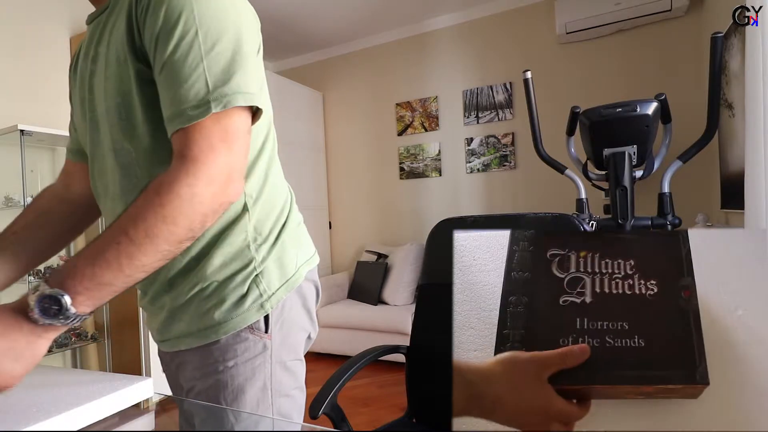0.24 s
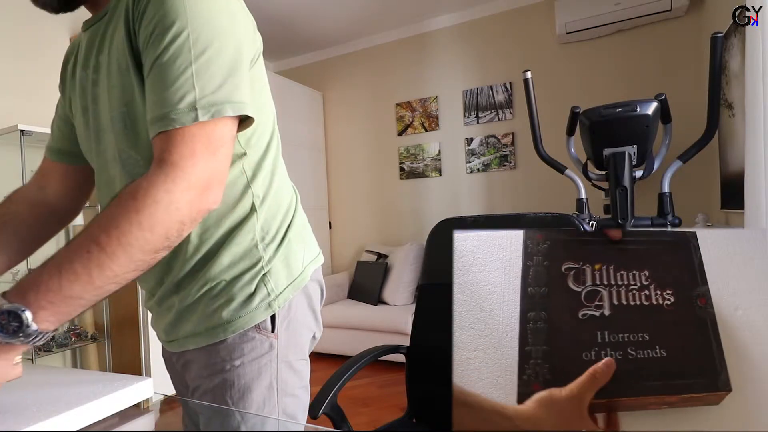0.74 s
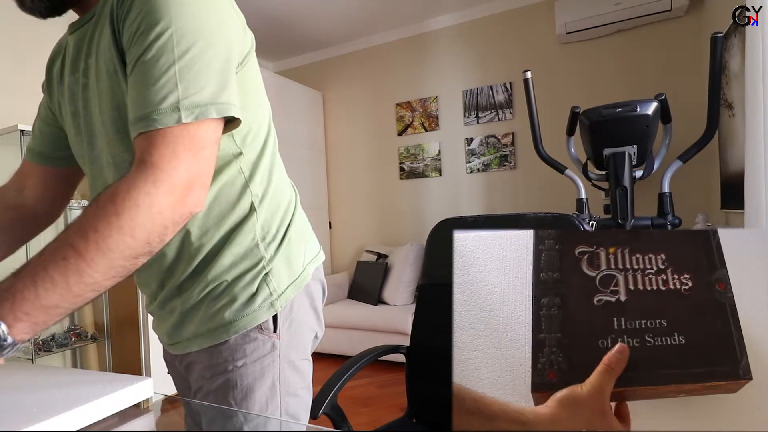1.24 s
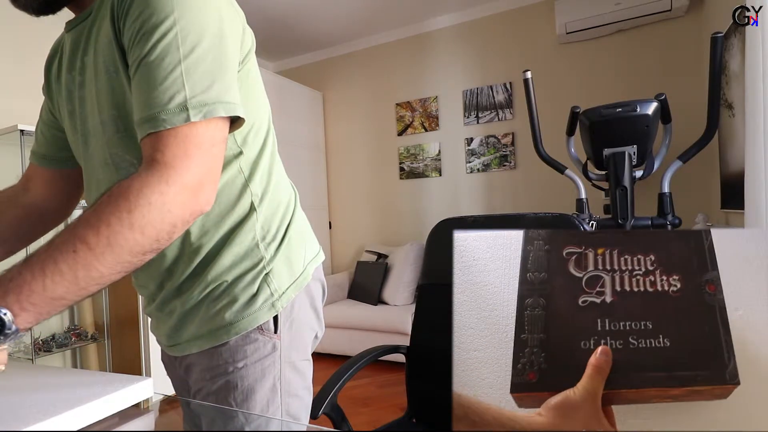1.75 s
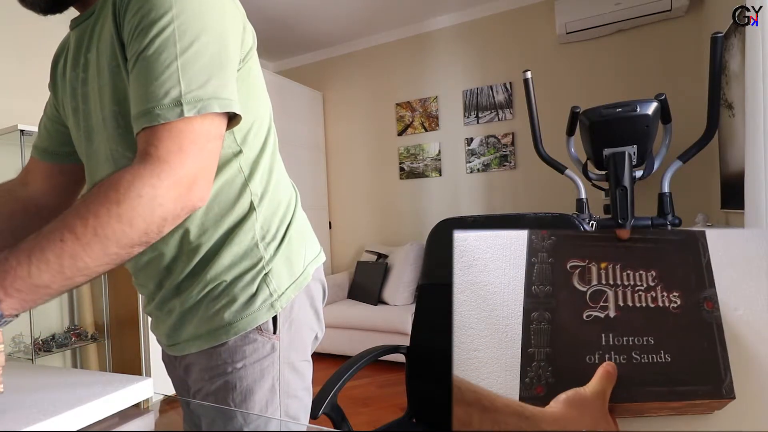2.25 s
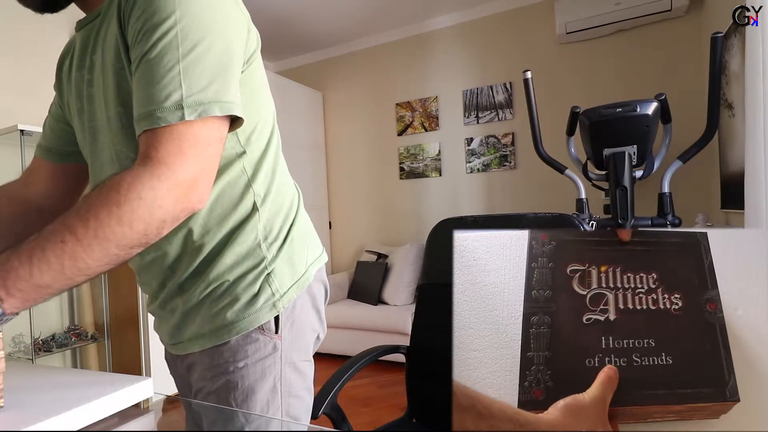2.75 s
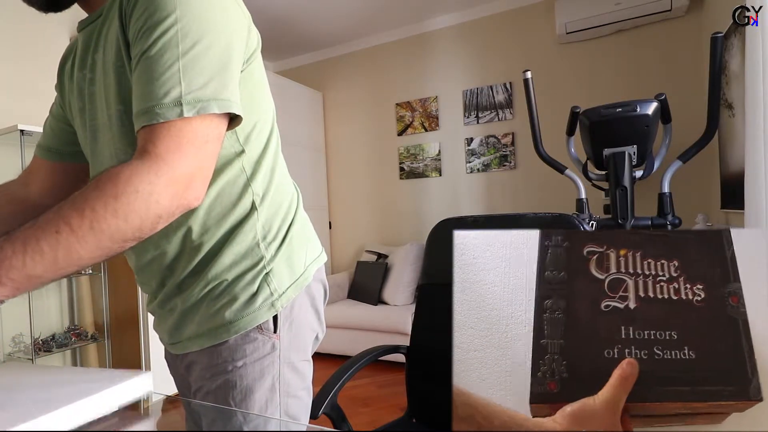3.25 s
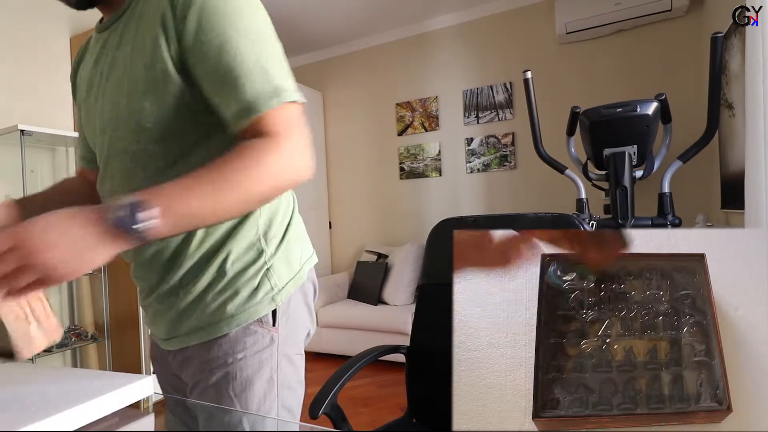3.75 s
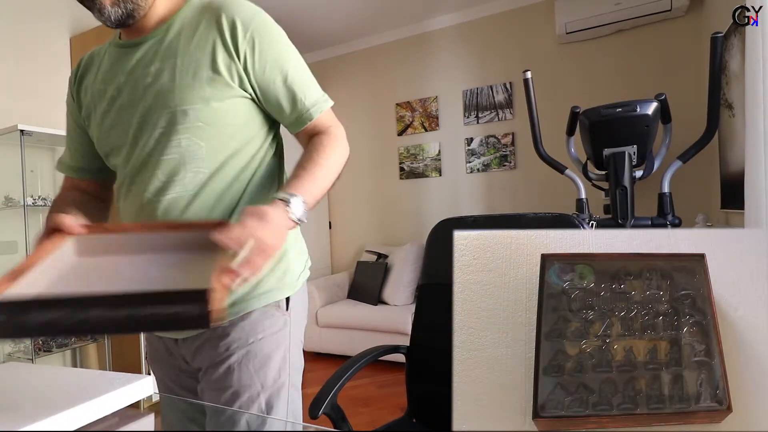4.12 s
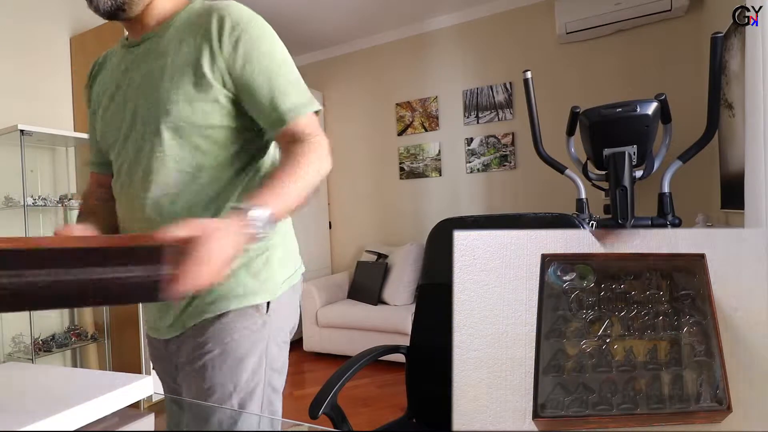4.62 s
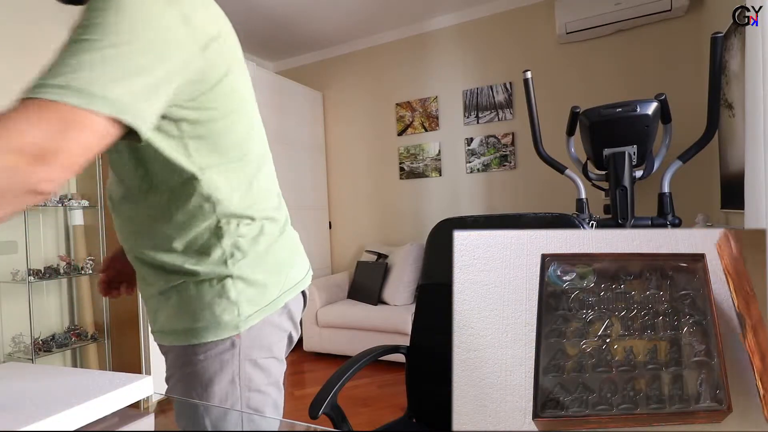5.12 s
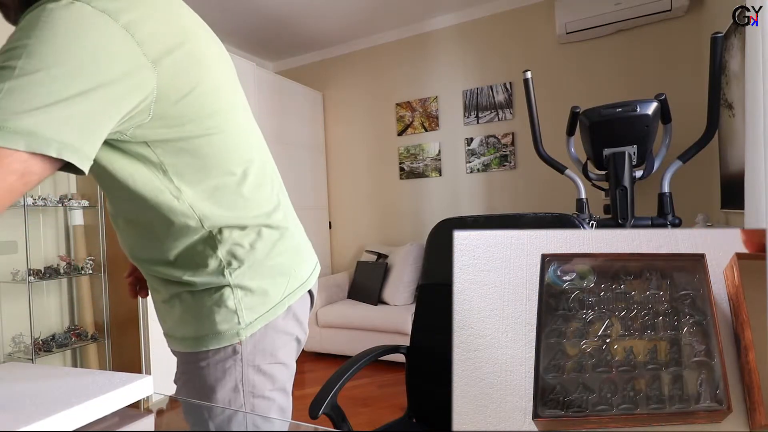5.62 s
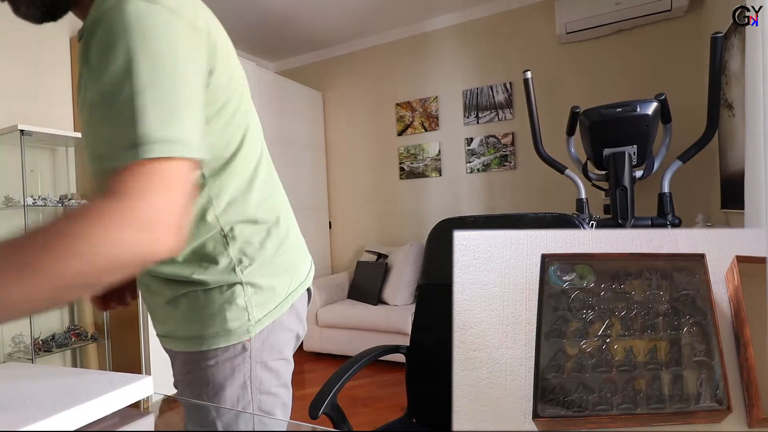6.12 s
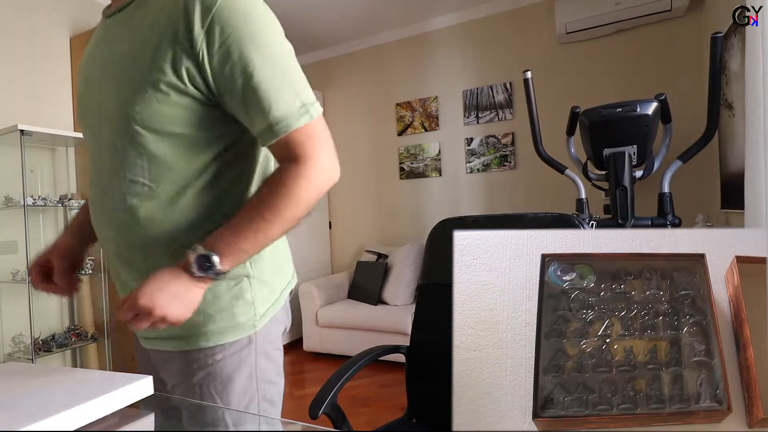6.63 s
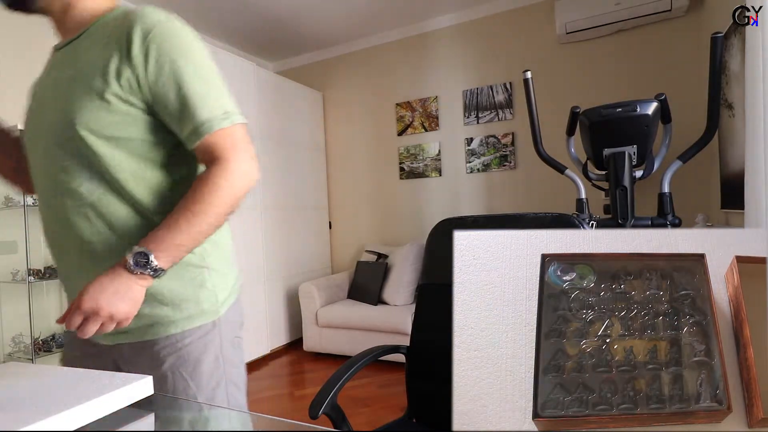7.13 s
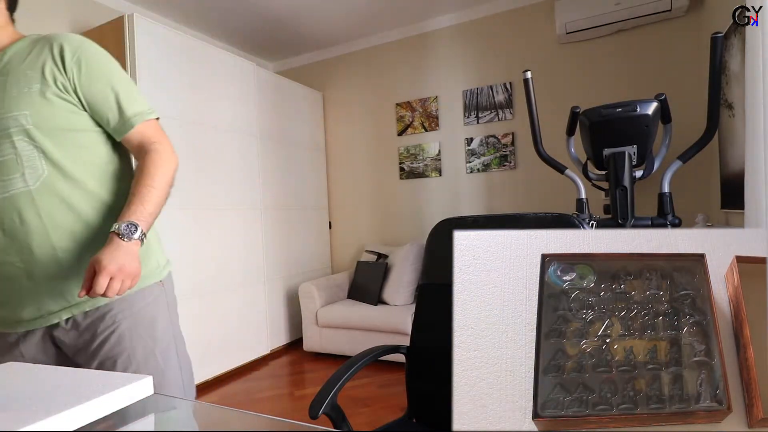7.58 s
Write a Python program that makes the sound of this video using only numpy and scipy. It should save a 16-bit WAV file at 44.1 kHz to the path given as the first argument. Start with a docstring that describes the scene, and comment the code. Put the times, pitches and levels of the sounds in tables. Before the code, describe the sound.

A tight cardboard box lid creaks and creeps loose, rasps free with hollow knocks, then is set down on a table with a scrape and thud.

```python
"""A fairly live living room, with a camera's stereo microphone close to a table and a cardboard game box.
The tight lid is worked loose, rasps off, is turned in the hands and slid down onto the table.
Stick-slip grains and knocks sound the cardboard panels, fingers swish and squeak on the paper wrap.
Clothes rustle and steps follow, as coloured grains that swell and fade with each movement.
A diffuse tail and a few standing waves ring behind it all, over a faint rumble and capsule hiss."""
import sys
import numpy as np
from scipy import signal
from scipy.fft import rfft, irfft
from scipy.io import wavfile
from scipy.ndimage import map_coordinates

SR = 44100
rng = np.random.default_rng(int(sys.argv[2]) if len(sys.argv) > 2 else 0)


def digitize_waveform(pressure):
    """Quantize a signal to 16-bit integers and store it at the path in sys.argv[1].

    Rows of a 2-D input are taken as channels; values are limited to [-1, 1].
    """
    field = np.atleast_2d(pressure).T
    bounded = np.clip(field, -1, 1)
    quanta = np.round(bounded * 32767).astype(np.int16)
    wavfile.write(sys.argv[1], SR, quanta)


N = 346254
T = np.arange(N) / SR
RING = T[:SR // 3]  # time axis of a panel's ring
TAIL = T[:SR]  # time axis of the room's ring


def undb(db):
    """Decibels to gain."""
    return 10 ** (np.asarray(db) / 20)


def unit(x):
    """Scale a response to a mean energy of one per channel."""
    return x / np.sqrt(np.mean(np.sum(x ** 2, axis=-1)))


def fade(t, t60):
    """Exponential decay, 60 dB down after t60."""
    return np.exp(-np.log(1000) * t / t60)


def gain_curve(rows):
    """Gain over time from (t/s, level/dB) rows; silent outside them."""
    s, db = np.transpose(rows)
    inside = (T >= s[0]) * (T <= s[-1])
    return undb(np.interp(T, s, db)) * inside


def on_log(hz, points_hz, values):
    """Read values along a logarithmic frequency axis."""
    return np.interp(np.log(np.maximum(hz, 1)), np.log(np.maximum(points_hz, 1)), values)


def convolve(x, response):
    """Pass channels through a response, keeping their length."""
    x = np.atleast_2d(x)
    return signal.oaconvolve(x, np.atleast_2d(response), axes=1)[:, :x.shape[1]]


def colour(x, points, size=4096):
    """Minimum-phase filter with a (f/Hz, level/dB) shape; white noise keeps its level."""
    hz, db = np.transpose(points)[:2]
    wanted_gain = undb(on_log(np.fft.rfftfreq(size, 1 / SR), hz, db))
    cepstrum = irfft(np.log(wanted_gain))
    # folding the cepstrum forward makes the filter causal
    cepstrum[1:size // 2] *= 2
    cepstrum[size // 2 + 1:] = 0
    response = irfft(np.exp(rfft(cepstrum)))
    return convolve(x, unit(response))


def split(x, edge_hz):
    """Part a sound into what lies below and above edge_hz, without delay."""
    low = signal.sosfiltfilt(signal.butter(2, edge_hz, fs=SR, output="sos"), x)
    return low, x - low


def ring(modes, t):
    """Damped sines from (f/Hz, energy level/dB, t60/s) rows."""
    return sum(undb(db) * unit(np.sin(2 * np.pi * hz * t) * fade(t, t60)) for hz, db, t60 in modes)


def add(out, s, sound, db):
    """Mix in a blow at time s; its level is its energy spread over a hundredth of a second."""
    start = int(s * SR)
    part = np.atleast_2d(unit(sound))[:, :N - start]
    out[:, start:start + part.shape[1]] += part * undb(db) * np.sqrt(SR / 100)


def walk(rate):
    """Random wandering in straight lines between rate points a second, with a spread near one."""
    points = rng.standard_normal(4096)
    return np.interp(T * rate, np.arange(len(points)), points)


def slips(rate, spread_db, channels=1):
    """Stick-slip: rate sudden releases a second, unequal in size, at random moments; rms one."""
    happens = rng.random((channels, N)) < rate / SR
    sizes = undb(spread_db * np.clip(rng.standard_normal((channels, N)), -2, 2))
    pulses = happens * sizes * rng.choice([-1, 1], (channels, N))
    return pulses / np.std(pulses)


def rubbing(gain, rate, spread_db, flutter_db):
    """Fine fibres catch and let go all over a surface while the pressure flutters."""
    return slips(rate, spread_db, channels=2) * gain * undb(flutter_db * walk(90))


def strokes(rows, attack_s, sag_db, release_t60):
    """Gain of rubbing strokes: each grips quickly, loses pressure along its length and lets go."""
    gain = np.zeros(N)
    for start, length, db in rows:
        t = T[T >= start] - start
        grip = np.minimum(t / attack_s, 1)
        pressure = undb(db - sag_db * np.minimum(t / length, 1))
        gain[N - len(t):] += grip * pressure * fade(np.maximum(t - length, 0), release_t60)
    return gain


def swings(rows, rise_share, edge_db):
    """Gain of body movements: each swells, peaks and fades, edge_db weaker at both ends of its length."""
    power = np.zeros(N)
    for s, length, db in rows:
        # distance from the peak: 0 there, 1 at either end
        away = np.maximum((s - T) / rise_share, (T - s) / (1 - rise_share)) / length
        near = away < 2
        power[near] += undb(db - edge_db * away[near] ** 1.3) ** 2
    return np.sqrt(power)


def spread(noise, wide_hz):
    """Two unrelated noises become a stereo pair that is alike in the bass and unrelated above wide_hz."""
    size = noise.shape[1]
    mid, side = rfft(noise)
    width = np.minimum(np.fft.rfftfreq(size, 1 / SR) / wide_hz, 1) ** 2
    pair = mid + np.array([[1], [-1]]) * width * side
    return irfft(pair / np.sqrt(1 + width ** 2), size)


def place(x, lag_ms, left_db):
    """The sound reaches the right capsule lag_ms later; left is left_db louder, or softer if negative."""
    left, right = np.broadcast_to(x, (2, N))
    late = map_coordinates(right, [(T - lag_ms / 1000) * SR], order=3)
    return np.array([left * undb(left_db / 2), late * undb(-left_db / 2)])


def shade_right(pair, edge_hz, leak):
    """The camera body keeps most of the highest treble from the right capsule."""
    left, right = pair
    shaded = signal.sosfiltfilt(signal.butter(3, edge_hz, fs=SR, output="sos"), right)
    return np.array([left, shaded + leak * (right - shaded)])


def knocks(rows, modes, flex_db, flex_t60, tick_t60):
    """Each blow favours the modes near one pitch; the panels flex briefly and the hard wrap ticks."""
    # colour of the tick: f/Hz, relative level/dB
    tick_colour = [(500, 4.5), (1300, -0.5), (2100, -7), (3400, 7.5), (4900, -6), (6500, 4.5), (8500, 7),
                   (10500, -5), (15500, -13.5)]
    out = np.zeros((2, N))
    hz, mode_db, t60 = np.transpose(modes)
    for s, db, favoured_hz, focus_db, tick_db in rows:
        noise = rng.standard_normal((4, len(RING)))
        weights = mode_db - focus_db * abs(np.log2(hz / favoured_hz))
        # modes swing in opposite directions, pair by pair
        tone = sum((-1) ** (k // 2) * ring([mode], RING) for k, mode in enumerate(zip(hz, weights, t60)))
        # a small panel radiates hardly any deep bass
        tone = signal.sosfilt(signal.butter(2, 150, "high", fs=SR, output="sos"), tone)
        # the crowd of weak modes between the strong ones
        crowd = [(hz[0] / 2, weights[0] - 25), *zip(hz, weights), (hz[-1] * 2, weights[-1] - 25)]
        flex = colour(spread(noise[:2], wide_hz=700) * fade(RING, flex_t60), crowd)
        tick = colour(noise[2:] * fade(RING, tick_t60), tick_colour)
        add(out, s, unit(tone) + undb(flex_db) * unit(flex), db)
        add(out, s, tick, tick_db)
    return out


def floor():
    """Faint room rumble shared by both capsules, and each capsule's own hiss."""
    # colour of the quiet room: f/Hz, relative level/dB
    floor_colour = [(15, -25), (25, -13), (102, -5.5), (222, -7.5), (276, -0.5), (333, -6), (981, -11.5),
                    (1320, -11), (2520, -15.5), (3390, -14.5), (5090, -21), (5820, -16.5), (8490, -14),
                    (14200, -27), (15800, -27)]
    noise = rng.standard_normal((3, N))
    own, shared = noise[:2], noise[2]
    bass = signal.butter(1, 400, fs=SR)
    mixed = own + signal.lfilter(*bass, 0.97 * shared - .5 * own)
    return colour(mixed, floor_colour) * undb(-67)


def room(x):
    """A diffuse tail that dies octave by octave, and a few standing waves."""
    # diffuse tail: f/Hz, t60/s, level/dB
    tail_rows = [(100, 0.72, -2), (300, 0.53, -3), (700, 0.46, -1.5), (1800, .6, -3), (5000, 0.57, -3.5),
                 (14100, 0.23, -2)]
    # standing waves: f/Hz, level/dB, t60/s
    standing_waves = [(116, -27.5, 0.72), (182.1, -30.5, 1), (239.7, -33, 0.51), (382, -32.5, 0.68),
                      (441, -34.5, 0.79), (511, -40.5, 0.68), (559, -30, 0.36), (648, -44, 1),
                      (756, -32, 0.16)]
    hz, t60, db = np.transpose(tail_rows)
    spectrum = rfft(spread(rng.standard_normal((2, SR)), wide_hz=633))
    octave = np.round(np.log2(np.maximum(np.fft.rfftfreq(SR, 1 / SR), 64)))
    tail = 0
    for k in np.unique(octave):
        # the tail arrives 4 ms after the direct sound
        envelope = unit(fade(TAIL, on_log(2 ** k, hz, t60)) * (TAIL > .004))
        band = irfft(spectrum * (octave == k), SR)
        tail = tail + band * envelope * undb(on_log(2 ** k, hz, db))
    return convolve(x, tail + ring(standing_waves, TAIL))


def footsteps():
    """The floor rumbles softly as the weight rolls onto a shoe."""
    # shoes on the wooden floor: t/s at full weight, length/s, level/dB
    step_rows = [(6.94, 0.078, -69), (7.18, 0.24, -69), (7.44, 0.12, -66), (7.765, 0.19, -54)]
    # colour of the floor: f/Hz, relative level/dB
    step_colour = [(30, -15), (60, -2), (100, -2), (200, 4.5), (290, 0), (420, -2.5), (800, -14),
                   (3000, -46)]
    weight = swings(step_rows, rise_share=0.39, edge_db=13.5)
    return colour(slips(rate=450, spread_db=2.5) * weight, step_colour)


def clothes():
    """Fabric fibres rustle with the speed of each movement, which sets scrape and hiss separately."""
    # brushes of shirt, trousers and palms: t/s at the fastest, length/s, level/dB, treble/dB above it
    brushes = np.array([(3.737, 0.19, -60, -2), (3.846, 0.14, -47.5, -4), (4.056, 0.31, -60.5, 2),
                        (4.289, 0.16, -54, 1), (4.438, .12, -58, 2), (4.65, 0.54, -65.5, 1.5),
                        (4.896, 0.43, -64, 1), (5.11, .6, -68, 3), (6.43, 0.25, -62.5, -1),
                        (6.797, 0.75, -68.5, 2.5), (7.292, 0.41, -59, 2), (7.621, 0.16, -48, -1.5)])
    # colour of the fabric: f/Hz, relative level/dB
    cloth_colour = [(100, -31), (220, -11), (400, -1.5), (850, -4.5), (1400, 2), (2000, -2), (2600, -5),
                    (3500, -6), (4900, -13), (6800, -5), (8500, -2), (11000, -16), (15800, -22.5)]
    rustle = colour(rubbing(1, rate=9000, spread_db=3.5, flutter_db=1.95), cloth_colour)
    low, high = split(rustle, 2800)
    treble_rows = [(s, length, db + treble_db) for s, length, db, treble_db in brushes]
    scrape_gain = swings(brushes[:, :3], rise_share=0.35, edge_db=12.5)
    hiss_gain = swings(treble_rows, rise_share=0.35, edge_db=12.5)
    return low * scrape_gain + high * hiss_gain


def bumps():
    """Soft pushes swing a whole panel or the table top, with a weaker, shorter partial below."""
    # dull bumps of box, lid and foot: t/s, level/dB before a lift of 3 dB, f/Hz, t60/s
    bump_rows = [(1.219, -60, 121, 0.36), (1.299, -61.5, 116, 0.2), (1.408, -56.5, 124, 0.2),
                 (2.459, -55.5, 117, 0.096), (2.552, -53, 118, 0.16), (3.214, -55, 100, 0.2),
                 (3.302, -40.5, 116, 0.19), (3.883, -52.5, 82, 0.3), (4.087, -49.5, 102.4, 0.26),
                 (4.429, -58, 100, 0.58), (5.538, -60, 92.6, 0.78), (5.975, -41.5, 114, 0.45),
                 (6.034, -41, 118.7, 0.19)]
    out = np.zeros((2, N))
    for s, db, hz, t60 in bump_rows:
        swing = ring([(hz, 0, t60), (hz * 0.76, -9, t60 / 2)], TAIL)
        soft_start = 1 - fade(TAIL, 0.015)
        add(out, s, swing * soft_start, db + 3.0)
    return out


def table_knocks():
    """The lid meets the table, then falls flat, and its modes ring against the table top."""
    # blows: t/s, level/dB, favoured f/Hz, focus/dB per octave, tick level/dB
    table_blows = [(5.537, -36.5, 424, 3.2, -44), (5.54, -37.5, 3700, 21, -36.5),
                   (5.632, -46.5, 600, 1.6, -50), (5.916, -45, 1300, 5, -42.5), (5.974, -28, 403, 2, -37.5),
                   (5.979, -32.5, 800, 3.7, -53), (5.993, -30.5, 380, 6.9, -60),
                   (6.034, -34, 700, 2.8, -46)]
    # modes of the lid lying on the table: f/Hz, relative level/dB, t60/s
    table_modes = [(194, -5.5, 0.024), (292, -2.5, 0.072), (403, -2.5, 0.1), (446, 1.5, 0.11),
                   (634, -5, 0.058), (800, -8.5, 0.015), (953, -6, 0.068), (1130, -7.5, .05),
                   (1340, -7, 0.13), (1575, -11, 0.051), (2350, -17.5, 0.057), (2960, -18.5, 0.03),
                   (3700, -24, .05)]
    return knocks(table_blows, table_modes, flex_db=5.5, flex_t60=0.059, tick_t60=0.013)


def table_slide():
    """The cardboard edge chatters and hisses along the table; its highest part beams at the left capsule."""
    # lid edge on the table: t/s, scrape level/dB, treble level/dB, both before their trims below
    slide_rows = np.array([(5.555, -46.5, -52), (5.603, -62, -68), (5.627, -45.5, -59), (5.661, -56.5, -72),
                           (5.699, -42, -70), (5.711, -39, -43), (5.903, -49, -38.5), (5.913, -52, -36),
                           (5.965, -46, -64)])
    # colour of the edge: f/Hz, relative level/dB
    slide_colour = [(80, -34), (221, -23), (440, -6.5), (650, -13), (900, -1.5), (1150, -8.5), (1580, -5.5),
                    (2400, -8.5), (3600, -6.5), (5000, -12), (7000, -3), (8890, 1.5), (11000, -9),
                    (15800, -11.5)]
    chatter = colour(rubbing(0.91, rate=3500, spread_db=2.5, flutter_db=2.2), slide_colour)
    low, high = split(chatter, 6000)
    scrape = low * gain_curve(slide_rows[:, :2]) * undb(5.5)
    treble = high * gain_curve(slide_rows[:, ::2]) * undb(1.5)
    # the reflection in the wedge between lid and table comes sooner as the lid sinks
    echo_s = np.interp(T, [5.6, 5.97], [.0019, .0008])
    echo = np.array([np.interp(T - echo_s, T, channel) for channel in scrape])
    return shade_right(scrape + .5 * echo + treble, edge_hz=12200, leak=0.22)


def lid_knocks():
    """Fingers catch the loose, hollow lid and ring its panels; at 4.008 s they only swish past it briefly."""
    # blows: t/s, level/dB, favoured f/Hz, focus/dB per octave, tick level/dB; the row at 4.008 s is a brief
    # swish of the fingers that barely rings the panels
    lid_blows = [(3.711, -40.5, 1130, 6.2, -63), (3.72, -37.5, 511, 12.4, -56.5),
                 (3.789, -43.5, 511, 3, -58), (4.008, -75, 1296, 4.5, -53), (4.047, -51, 1220, 2.7, -62),
                 (4.086, -40.5, 1340, 1.1, -56), (4.096, -45, 355, 20, -68), (4.42, -54.5, 1320, 1.9, -64)]
    # modes of the open lid: f/Hz, relative level/dB, t60/s
    lid_modes = [(237, -2.5, 0.051), (360, -7.5, 0.077), (431, -1, 0.12), (511, -1, 0.053),
                 (780, -9, 0.073), (967, -9.5, 0.17), (1130, -4, 0.1), (1340, -2.5, 0.033),
                 (1950, -18.5, .04), (3370, -16.5, .02)]
    return knocks(lid_blows, lid_modes, flex_db=-0.5, flex_t60=0.04, tick_t60=0.039)


def squeaks():
    """A fingertip's slips on the wrap lock onto one panel resonance and waver around it."""
    # squeaks: start t/s, length/s, f/Hz, level/dB
    squeak_rows = [(1.092, .014, 3090, -51), (1.128, 0.039, 975, -49.5)]
    out = np.zeros(N)
    for s, length, hz, db in squeak_rows:
        phase = 2 * np.pi * np.cumsum(hz * (1 + 0.017 * walk(250))) / SR
        pressure = strokes([(s, length, db)], attack_s=0.0071, sag_db=1.0, release_t60=0.047)
        out += np.sin(phase) * pressure
    return out


def finger_swish():
    """Skin drags over the paper wrap and keeps a few panel resonances singing."""
    # fingers and wrap sliding on the box: start t/s, length/s, level/dB
    swish_rows = [(0, 0.057, -63.5), (.09, 0.14, -63.5), (.3, 0.027, -68), (.996, 0.0099, -59),
                  (1.027, 0.043, -48.5), (1.092, 0.053, -48), (1.15, 0.066, -57), (1.57, 0.023, -59),
                  (1.742, 0.035, -52), (2.11, 0.11, -63.5), (2.32, 0.055, -67.5), (2.553, 0.021, -56),
                  (2.72, 0.017, -58.5), (3.15, 0.15, -59.5), (3.21, .07, -50), (3.277, 0.018, -33.5),
                  (3.372, .04, -63)]
    # colour of skin on paper: f/Hz, relative level/dB
    swish_colour = [(300, -17), (700, -7.5), (1000, -1.5), (1900, -3.5), (3100, -6), (4900, -10.5),
                    (6500, -5), (8400, -0.5), (10500, -11.5), (15500, -19)]
    # resonances the rubbing keeps ringing: f/Hz, level/dB, t60/s
    wrap_modes = [(949, -14.5, .16), (1340, -14.5, 0.11), (3090, -22, .035)]
    pressure = strokes(swish_rows, attack_s=.011, sag_db=1.5, release_t60=0.073)
    grains = rubbing(pressure, rate=2000, spread_db=3.5, flutter_db=0.0)
    hiss = shade_right(colour(grains, swish_colour), edge_hz=12800, leak=.45)
    return hiss + convolve(grains, ring(wrap_modes, RING)) + squeaks()


def box_knocks():
    """Knocks on the closed box ring its cardboard panels."""
    # blows: t/s, level/dB, favoured f/Hz, focus/dB per octave, tick level/dB
    box_blows = [(.078, -41, 560, 9, -57), (.169, -48.5, 380, 20, -70), (.3, -62, 700, 13, -75),
                 (.418, -66.5, 355, 17, -84), (.779, -58.5, 645, 13, -72), (.879, -57, 420, 20, -84),
                 (1.068, -37.5, 690, 15, -65), (1.07, -47, 253, 13, -68), (1.559, -50.5, 300, -1, -52),
                 (1.625, -50.5, 1100, 24, -58.5), (1.697, -51, 403, -2, -72), (1.736, -34.5, 246, 4, -46.5),
                 (1.75, -42, 247, 10, -70), (1.784, -45.5, 1310, 24, -56), (2.056, -50.5, 278, 14, -59.5),
                 (2.306, -55, 1410, 21, -62.5), (2.46, -44.5, 640, 11, -55), (2.522, -52.5, 640, 8, -58),
                 (2.71, -47.5, 300, 19.5, -69), (2.84, -53.5, 1210, 17.5, -64), (3.213, -37, 800, 2, -49),
                 (3.298, -27.5, 1320, 12, -38), (3.311, -29.5, 450, 13, -58), (3.377, -31.5, 654, 12, -49),
                 (3.406, -28, 605, 13.5, -71), (3.42, -36, 560, 13, -71), (3.499, -51, 597, -5, -58)]
    # modes of the box panels: f/Hz, relative level/dB, t60/s
    box_modes = [(194, -0.5, 0.032), (236, 13, 0.017), (293, 4, 0.096), (364, 5, 0.15), (470.5, -0.5, 0.2),
                 (560, -7, 0.027), (640, 4, 0.026), (722, -3.5, 0.029), (920, -5.5, 0.033),
                 (1130, -9.5, 0.056), (1290, -7.5, 0.029), (1460, -11, .04), (1640, -7.5, 0.048),
                 (2690, -18.5, .02)]
    return knocks(box_blows, box_modes, flex_db=0.5, flex_t60=0.043, tick_t60=0.032)


def lid_creep():
    """The lid creeps in small slips that drum the box; a harder pull makes them brighter."""
    # steady pull drawing the lid up the box walls: t/s, level/dB before a trim of -1 dB
    pull_rows = [(1.25, -66), (1.508, -62), (1.736, -58.5), (2.044, -57), (2.368, -52), (2.606, -62.5),
                 (3.19, -49.5)]
    # short tugs that shift the lid: start t/s, length/s, level/dB
    tug_rows = [(0, 0.038, -56.5), (.095, 0.078, -56.5), (.505, 0.079, -60), (.77, 0.25, -63.5),
                (1.55, 0.027, -59), (1.81, 0.028, -71), (2.77, 0.021, -53.5)]
    # colour of the drummed box: f/Hz, relative level/dB
    creep_colour = [(40, -42), (115, -9.5), (150, -19.5), (240, 4.5), (320, -7), (380, -2.5), (520, -16),
                    (680, -8), (900, -14.5), (1450, -15), (1950, -27.5), (2900, -24), (5000, -65)]
    tugs = strokes(tug_rows, attack_s=0.0087, sag_db=5.0, release_t60=.15)
    pull = gain_curve(pull_rows) * undb(-1) + tugs
    dull, bright = split(colour(slips(rate=520, spread_db=0.0) * pull, creep_colour), 600)
    return dull + bright * np.minimum(pull / undb(-57.5), 1.2) ** 0.23


def lid_rasp():
    """The rim judders as it comes free and sets the open lid ringing."""
    # the rim catching and rasping free: start t/s, length/s, level/dB
    rasp_rows = [(3.175, 0.042, -49.5), (3.211, 0.051, -33.5), (3.3, 0.021, -31), (3.37, 0.031, -31),
                 (3.425, 0.054, -43), (3.512, 0.016, -49.5)]
    # colour of the judder: f/Hz, relative level/dB
    rasp_colour = [(40, -42), (100, -4), (170, -11.5), (260, -3), (385, 3), (490, 2), (620, 1), (800, -3.5),
                   (1040, -8.5), (1300, -11), (1980, -28), (3580, -31.5), (6000, -51)]
    # resonances the judder keeps ringing: f/Hz, level/dB, t60/s
    rim_modes = [(380, -14, 0.16), (435, -24, 0.29), (561, -14, 0.076), (632, -20, 0.38), (770, -31, 0.11),
                 (903, -21.5, 0.15)]
    grip = strokes(rasp_rows, attack_s=0.015, sag_db=1.5, release_t60=0.17)
    judder = slips(rate=1000, spread_db=4.0) * grip
    return undb(-0.5) * colour(judder, rasp_colour) + convolve(judder, ring(rim_modes, RING))


def scene():
    """Box and lid to the left of the microphone, the person in front, all in one room."""
    box = box_knocks() + lid_creep() + bumps()
    near = (place(clothes() + footsteps(), lag_ms=0.072, left_db=-0.9)
            + place(table_knocks(), lag_ms=0.18, left_db=0.5)
            + place(table_slide(), lag_ms=0.257, left_db=1.0)
            + place(lid_knocks(), lag_ms=0.12, left_db=0.0)
            + place(finger_swish(), lag_ms=0.195, left_db=0.6)
            + place(box, lag_ms=0.17, left_db=1.8)
            + place(lid_rasp(), lag_ms=0.15, left_db=0.5))
    return near + room(near) + floor()


def record(dry):
    """Nothing sounds above 15750 Hz; the top ends steeply there."""
    return signal.sosfilt(signal.ellip(10, .2, 70, 15750, fs=SR, output="sos"), dry)


dry = scene()
out = record(dry)
digitize_waveform(out)
```